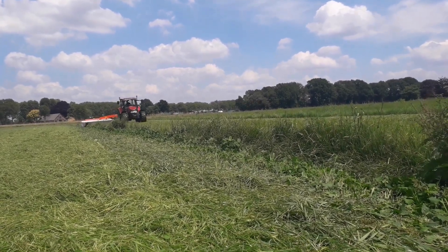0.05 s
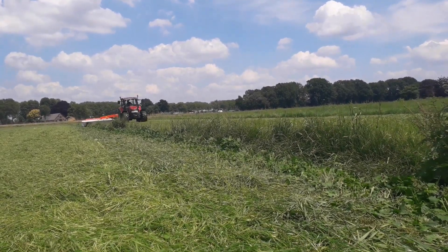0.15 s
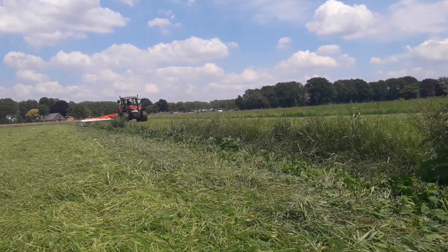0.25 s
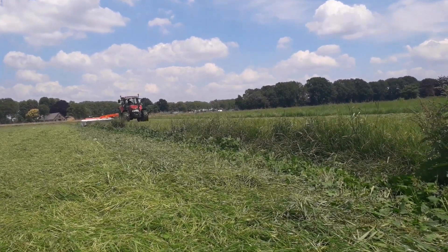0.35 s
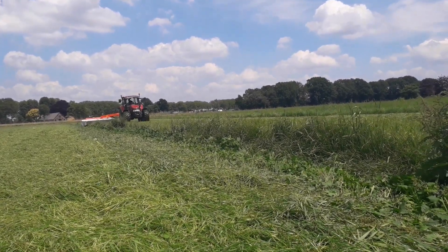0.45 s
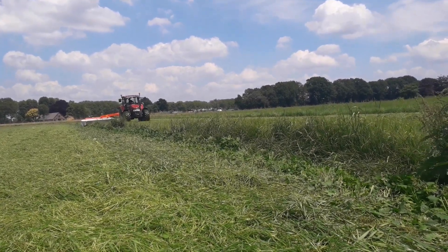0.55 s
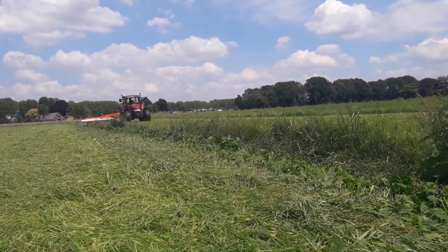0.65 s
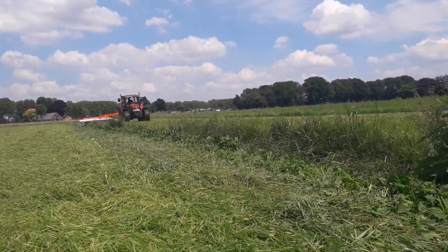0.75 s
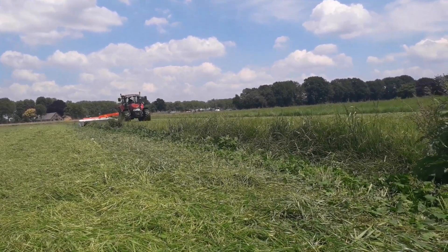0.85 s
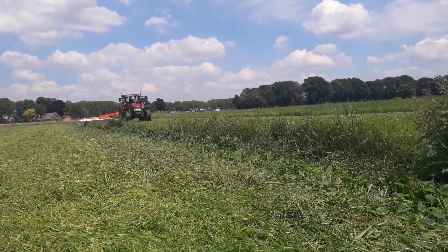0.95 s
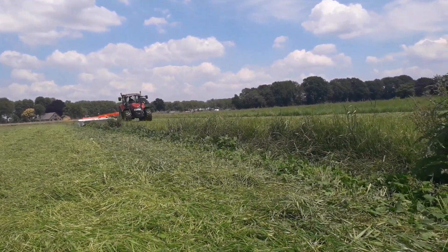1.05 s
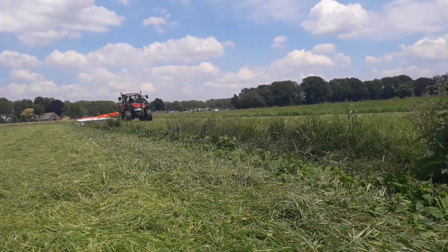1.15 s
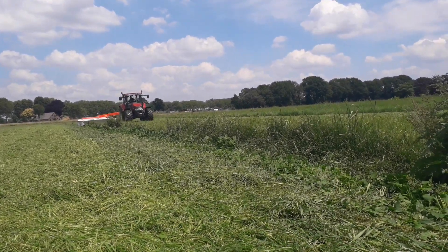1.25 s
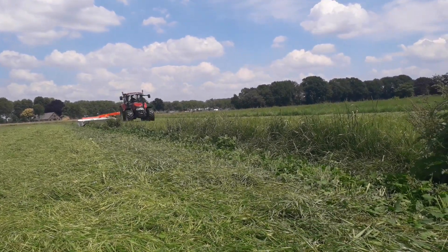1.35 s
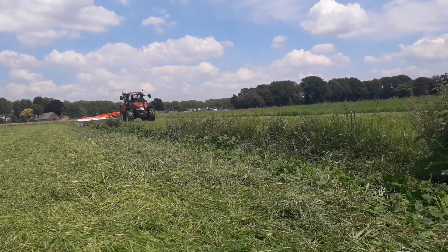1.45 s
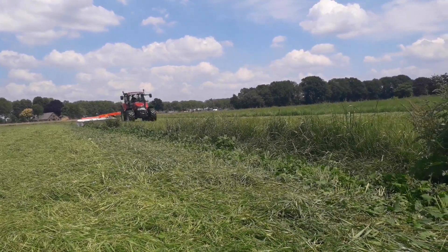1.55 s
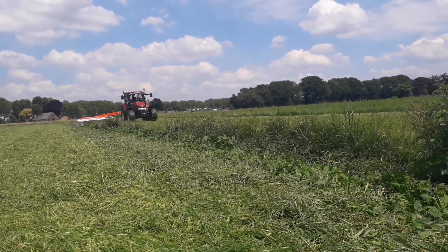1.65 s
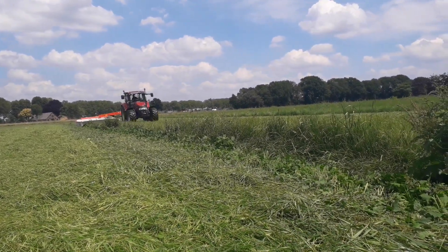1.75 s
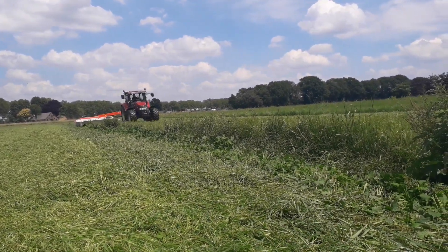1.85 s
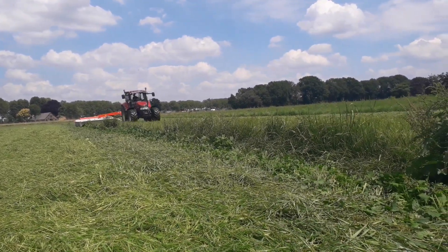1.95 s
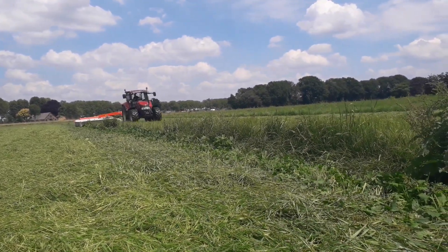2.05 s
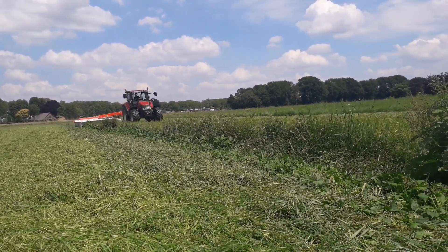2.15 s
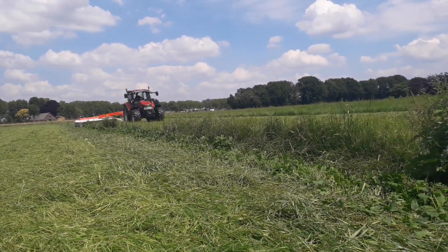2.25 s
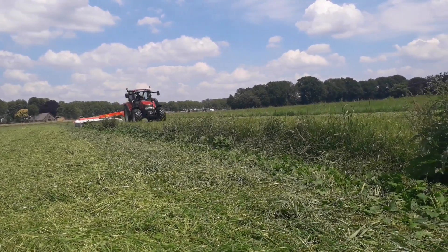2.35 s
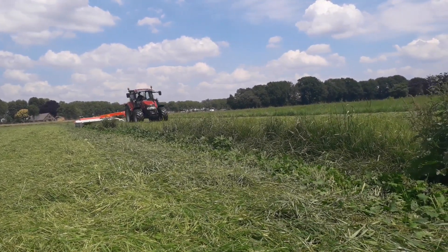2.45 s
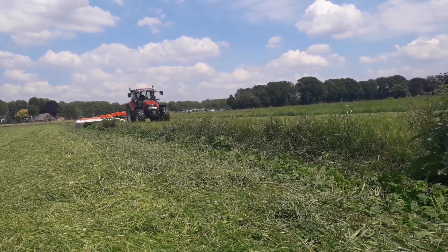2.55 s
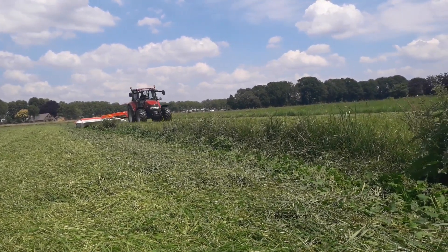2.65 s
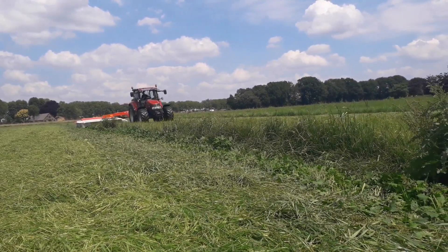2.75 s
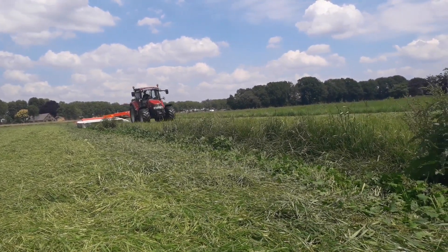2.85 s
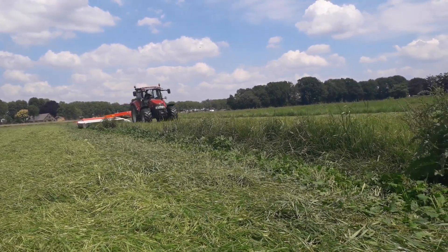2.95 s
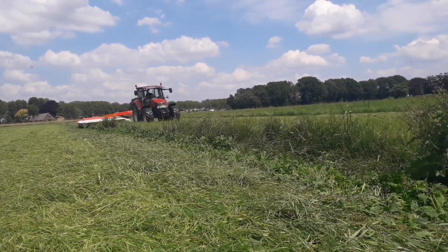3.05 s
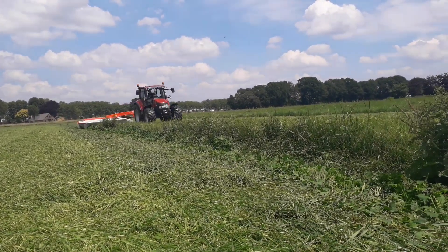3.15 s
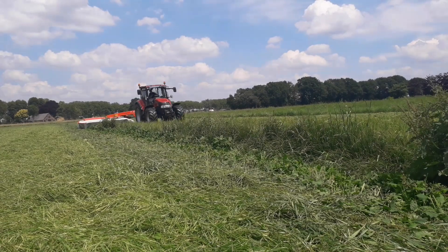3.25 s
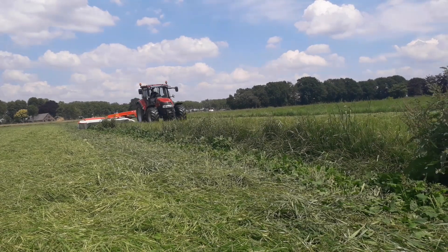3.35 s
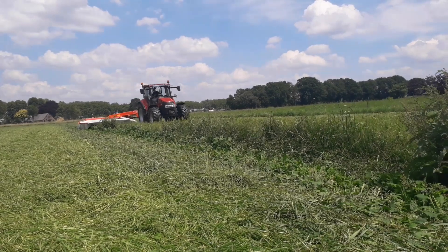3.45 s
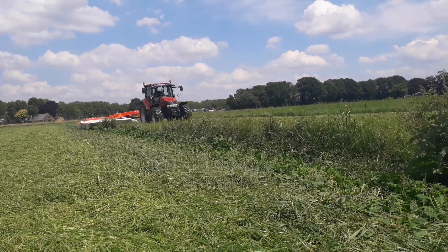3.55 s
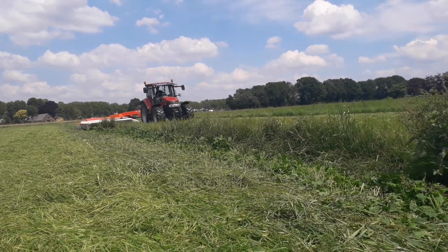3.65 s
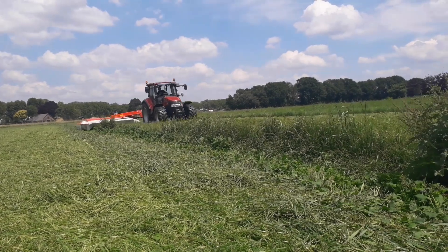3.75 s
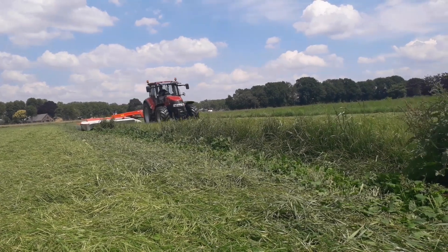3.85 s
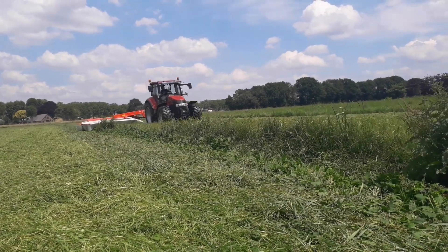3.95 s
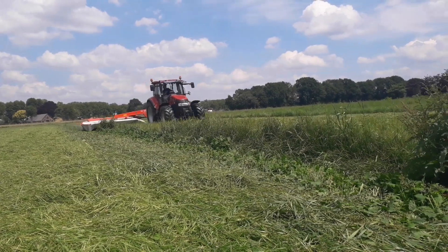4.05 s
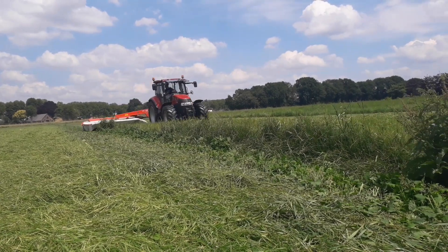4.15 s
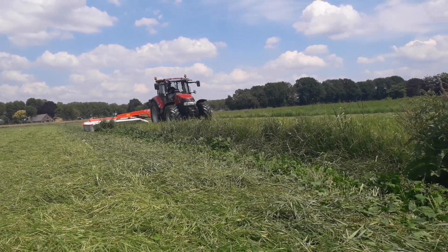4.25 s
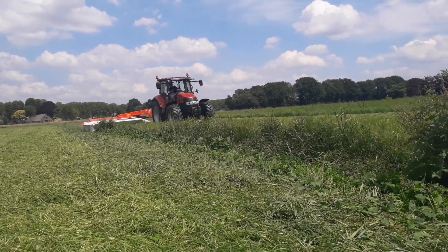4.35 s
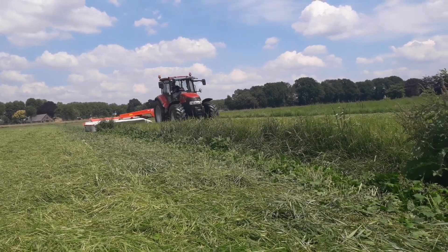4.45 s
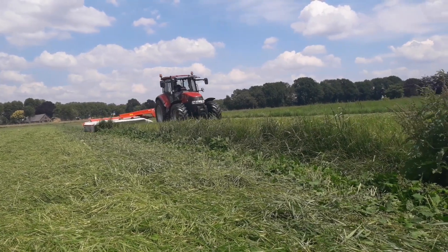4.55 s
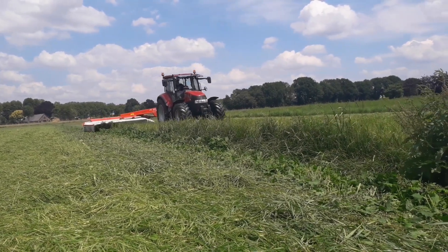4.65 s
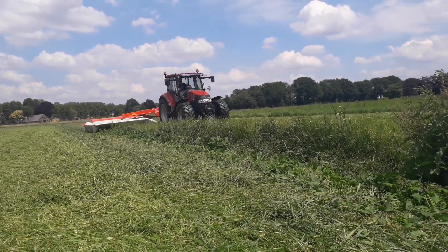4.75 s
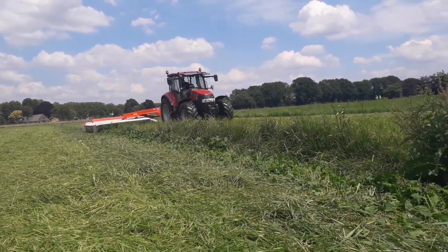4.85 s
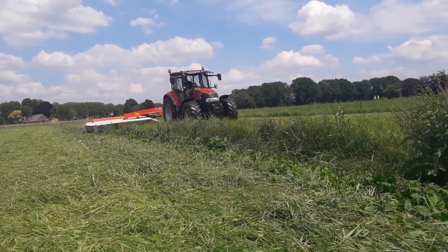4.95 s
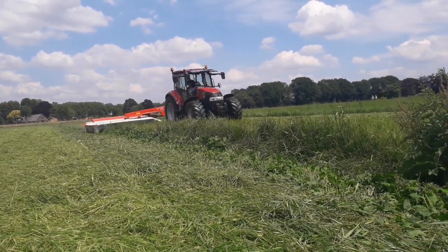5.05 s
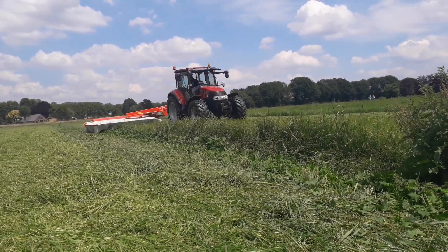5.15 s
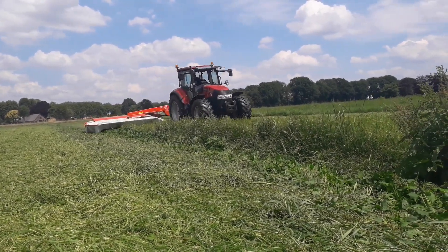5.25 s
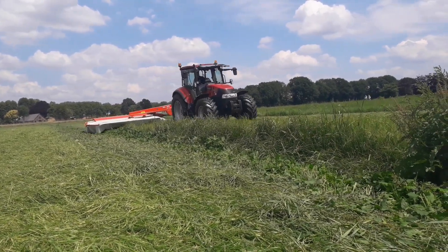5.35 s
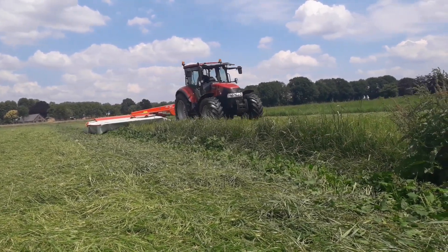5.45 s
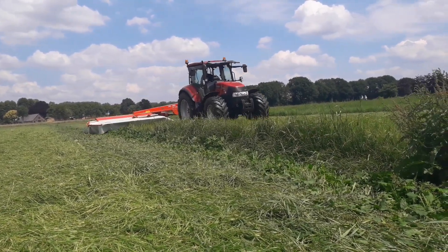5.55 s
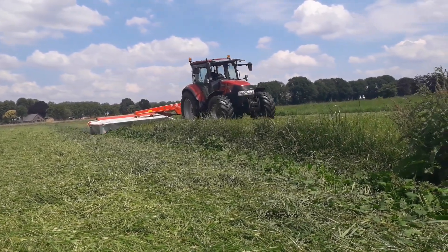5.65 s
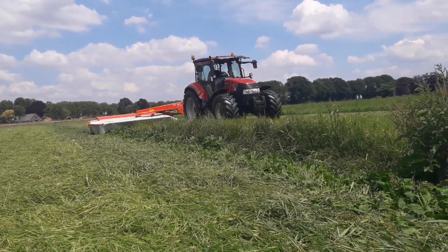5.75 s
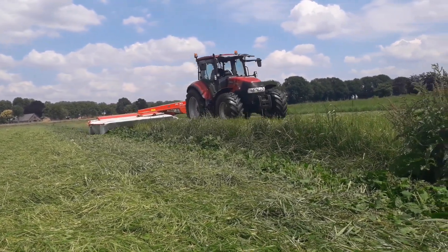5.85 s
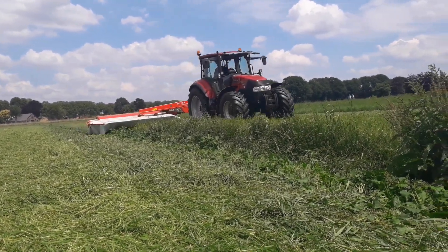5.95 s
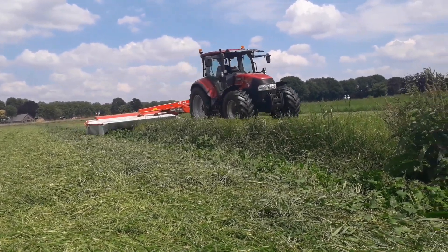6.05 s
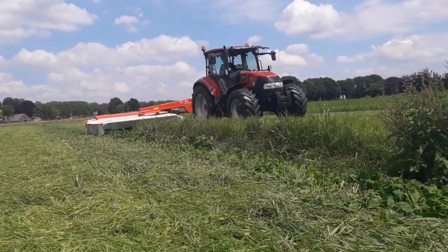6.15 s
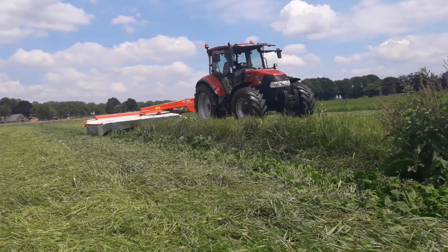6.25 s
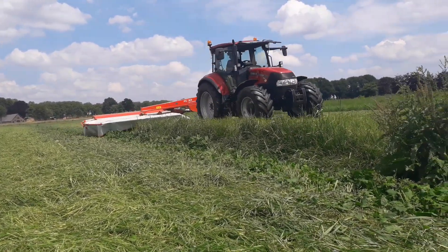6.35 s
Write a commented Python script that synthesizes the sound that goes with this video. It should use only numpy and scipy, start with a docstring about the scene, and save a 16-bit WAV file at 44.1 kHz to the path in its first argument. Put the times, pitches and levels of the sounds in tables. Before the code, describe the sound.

An open field with one stationary microphone, centred and dry. From 0 s a tractor and disc mower work some forty metres away: a steady hum around 205 Hz with a weaker tone an octave below, grainy diesel clatter, thin gear whine and a rushing, slightly uneven swish and hiss of cut grass. Tiny stalk cracks tick mainly before 1.7 s. The pitch sags slightly around 1.3 s and recovers. Wind rumble freshens, with soft thumps near 1.5 and 2.3 s, then hard ragged buffets around 2.4-3 s and 3.8-4 s, another at 4.3 s and scattered bumps to 5.8 s. From about 3.2 s the muffled exhaust note and boom open up. A sharper crack snaps at 4.8 s. By 5-6.4 s hum, clatter and bright grass hiss are close and strongest, with a very faint, extremely high turbo whistle, still approaching at the cut.

```python
"""Mowing an open hayfield

A tractor with a side-mounted disc mower comes closer, and a breeze rumbles and thumps on one microphone.
Sinusoids locked to the blade rate make the disc hum, gear whine and exhaust note; a free one, the turbo.
Filtered noise makes diesel clatter, the swish and hiss of cut stems, and wind; short bursts make cracks.
"""
import sys
import numpy as np
from scipy import signal
from scipy.fft import rfft, irfft
from scipy.io import wavfile
from scipy.ndimage import map_coordinates

SR = 44100
rng = np.random.default_rng(int(sys.argv[2]) if len(sys.argv) > 2 else 0)


def materialize(psi):
    """Save the field psi as 16-bit PCM at rate SR to the path in sys.argv[1].

    A 1-D psi becomes a single channel; in a 2-D psi each row is a channel.
    """
    bounded = np.clip(np.atleast_2d(psi).T, -1, 1)
    quanta = np.round(bounded * 32767).astype(np.int16)
    wavfile.write(sys.argv[1], SR, quanta)


N = 282240  # samples

# blade passes, sagging in thick grass: time_s, passes_per_s
BLADE_RATE = [(0, 103.5), (.3, 103.4), (.75, 102.7), (1.3, 102.0), (1.7, 102.1), (2.45, 102.7),
              (3.1, 103.3), (3.5, 103.0), (3.9, 103.1), (5.0, 102.4), (5.4, 102.9), (5.75, 102.7),
              (6.1, 103.1), (6.4, 103.2)]
# hum of the discs: time_s, level_db
HUM_LEVEL = [(0, -39.5), (.6, -37), (2.1, -34.5), (2.3, -30.5), (3.7, -27), (3.95, -25), (4.4, -26),
             (5.1, -21.5), (5.35, -22.5), (6.0, -19.8), (6.4, -19.6)]
# hum partials: multiple_of_blade_rate, relative_level_db
HUM_ORDERS = [(1, -7.5), (2, 0), (3, -22.5)]
# exhaust note, geared to the blades: multiple_of_blade_rate, relative_level_db
EXHAUST_ORDERS = [(6, 0), (6.55, -6), (7, -9), (8, -2.5), (8.5, -14), (9, -29)]
# gear whine: multiple_of_blade_rate, near_level_db, loss_db_per_m_farther_off
GEAR_ORDERS = [(9.43, -49.5, .65), (14.32, -37.5, 2), (15.1, -44.5, 0.5), (16.05, -45, 0.4),
               (19.25, -50, 0.7), (23.96, -45, 0.3), (25.4, -50, 4), (32.2, -48.5, 0.4)]
# turbocharger whistle: time_s, pitch_hz, level_db
TURBO_WHISTLE = [(0, 14900, -85), (2.6, 15080, -68), (3.8, 15110, -60), (3.95, 15120, -50),
                 (4.3, 15130, -60), (5.2, 15350, -68), (5.9, 15600, -53), (6.4, 15580, -51)]

# spectrum of the diesel clatter: frequency_hz, relative_level_db
CLATTER_COLOUR = [(200, -9), (400, -6), (550, -11.5), (720, -8), (920, -0.5), (1100, -5), (1300, -1.5),
                  (1580, -0.5), (1800, -2), (2000, 0), (2350, -3.5), (2900, -1.5), (4000, -3), (9000, -41)]
# spectrum of the engine block's drone: frequency_hz, relative_level_db
BLOCK_COLOUR = [(250, 9), (400, -3.5), (550, -1), (700, -1), (1000, -7), (2000, -32)]
# spectrum of the swath at the cutter bar: frequency_hz, relative_level_db
SWISH_COLOUR = [(1200, -21), (2400, -9), (3000, -4), (3400, 0.5), (3800, -3), (4300, -.5), (5300, -2),
                (6500, -7.5), (9000, -8), (16000, -38)]
# spectrum of the finer cutting hiss: frequency_hz, relative_level_db
HISS_COLOUR = [(3500, -13), (6000, -2), (7300, -4.5), (8400, -4), (9800, 3), (10800, -1.5), (12600, -3),
               (13600, -5.5), (16000, -9)]
# spectrum of the breeze's rumble: frequency_hz, relative_level_db
BREEZE_COLOUR = [(40, -26), (70, -3.5), (110, 0), (175, 3.5), (240, -6.5), (320, -16), (450, -46.5),
                 (700, -31), (1500, -69)]
# spectrum of the deep, slow eddies: frequency_hz, relative_level_db
SWELL_COLOUR = [(20, -28), (35, -16), (55, -7.5), (78, 2.5), (98, 5.5), (130, -18), (250, -69)]
# spectrum of the fine turbulence in hard gusts: frequency_hz, relative_level_db
GUST_COLOUR = [(150, -30), (280, 1), (420, -5), (550, -19), (750, -19), (1500, -50)]

# tufts and thin patches at the cutter bar: start_s, length_s, swish_lift_db, hiss_lift_db
TUFTS = [(.01, 0.028, 2.5, 7), (.27, 0.14, 4, 4.5), (.52, 0.12, 2.5, 3), (.7, 0.092, 4.5, 3.5),
         (1.0, 0.063, 4.5, 6), (1.16, 0.027, 4, 3), (2.15, 0.026, 1.5, 1.5), (2.64, 0.016, 5.5, 4.5),
         (2.79, 0.056, 1, 5), (3.19, 0.023, -0.5, 6.5), (3.52, .12, 0.5, 4), (3.9, 0.16, -1, -2),
         (4.18, 0.02, 1.5, 0.5), (4.8, 0.09, 5, 1.5), (5.37, 0.018, 0, 5.5)]
# the toughest stalks crack singly: start_s, relative_peak_db, centre_hz
CRACKS = [(.045, -15.5, 9700), (.554, -16, 5400), (.58, -13, 6800), (.724, -14, 10500), (.801, -17, 8000),
          (1.02, -12, 11000), (1.145, -16, 4900), (1.195, -16, 9000), (1.233, -16, 7500),
          (1.573, -13.5, 5500), (1.656, -16, 8500), (2.786, -15, 9000), (3.972, -17, 7600),
          (4.834, -4, 4570)]
# gusts: start_s, length_s, rumble_lift_db, deep_eddy_lift_db
GUSTS = [(.19, .04, 0, 11), (1.51, 0.075, 4.5, 15.5), (2.08, 0.13, -0.5, 13), (2.38, 0.16, 6.5, 18),
         (2.82, 0.14, 8.5, 15), (3.12, 0.25, 1.5, 11), (3.48, 0.21, 5, 11), (3.83, 0.12, 10, 21),
         (4.27, 0.3, 7.5, 14), (4.99, 0.079, 7.5, 10), (5.74, 0.18, 2.5, 5)]
# the hardest eddies strike the microphone: centre_s, relative_peak_db, pitch_hz
BUFFETS = [(1.237, -21, 119), (1.528, -20.5, 130), (2.08, -26, 95), (2.249, -16, 89), (2.365, -19, 94),
           (2.384, -14.5, 130), (2.45, -12, 275), (2.492, -13, 117), (2.781, -17.5, 200), (2.792, -23, 215),
           (2.875, -6, 195), (2.911, -11.5, 195), (2.919, -8.5, 109), (2.991, -14.5, 141),
           (3.17, -16, 85.5), (3.529, -16, 129), (3.704, -16, 200), (3.816, -14, 191), (3.827, -12, 95),
           (3.86, -11.5, 190), (3.872, -9, 225), (3.887, -9, 168), (3.912, -14, 183), (3.92, -7, 91),
           (3.941, -10, 89), (3.964, -18.5, 240), (4.336, -6.5, 114), (4.433, -12, 100), (4.49, -16, 140),
           (4.551, -17, 178), (4.645, -12, 110), (4.95, -11, 130), (4.998, -19, 200), (5.046, -21, 150),
           (5.074, -10.5, 168), (5.503, -11, 133), (5.793, -10, 111)]

START_M, SPEED_M_PER_S, NEAR_M = 42, 4.5, 13
# reference levels at NEAR_M; each growth is a power of 1 / distance (over 1: the ground absorbs too)
MACHINE_DB, MACHINE_FADE_DB_PER_M = -27, 0.6373
SWISH_DB, SWISH_GROWTH = -27, 0.91
HISS_DB, HISS_GROWTH = -26.5, 1.53
NOTE_DB, BOOM_DB, EXHAUST_GROWTH = -40, -38, 1.02
# from afar tall grass muffles exhaust and cutter bar; they open up between these times
MUFFLED_UNTIL_S, CLEAR_FROM_S = 3.15, 5.2
NOTE_MUFFLE_DB, BOOM_MUFFLE_DB = 13, 13.5
SWISH_MUFFLE_DB, HISS_MUFFLE_DB = 3.5, 2.5
TUFT_ATTACK_S, TUFT_RELEASE_S = 0.05, 0.059
# the breeze freshens steadily: starting level and rise of its rumble and of its deep eddies
BREEZE_DB, BREEZE_DB_PER_S = -39.5, 1.7649
SWELL_DB, SWELL_DB_PER_S = -55, 1.45
GUST_ATTACK_S, GUST_RELEASE_S = 0.055, 0.071
CUTOFF_HZ = 15800


def from_db(db):
    """Amplitude ratio: twenty decibels make a factor of ten."""
    return 10 ** (np.asarray(db) / 20)


def rms_one(x):
    """Normalisation: scale a signal to unit mean power."""
    return x / np.sqrt(np.mean(x ** 2) + 1e-20)


def in_time(rows):
    """Linear interpolation: each column of a timed curve, sample by sample."""
    s, *columns = np.transpose(rows)
    return [np.interp(np.arange(N) / SR, s, column) for column in columns]


def drift(rate_hz):
    """Low-pass noise: slow chance of unit spread, changing about rate_hz times a second."""
    step = 40  # samples between the points of the slow curve
    pole = np.exp(-2 * np.pi * rate_hz * step / SR)
    chance = rng.standard_normal(N // step + 2002)
    slow = signal.lfilter([1], [1, -2 * pole, pole * pole], chance)[2000:]  # settled part only
    return np.interp(np.arange(N) / step, np.arange(len(slow)), rms_one(slow))


def coloured(x, colour):
    """Source and filter: an excitation takes on a spectrum, at unit power."""
    hz, db = np.transpose(colour)
    bins_hz = np.maximum(np.fft.rfftfreq(N, 1 / SR), 1)
    gain = from_db(np.interp(np.log(bins_hz), np.log(hz), db))
    return rms_one(irfft(rfft(x) * gain, N))


def surges(rows, attack_s, release_s):
    """Gaussian shoulders: each event swells, holds and dies away; one dB curve per lift column."""
    t = np.arange(N) / SR
    lift_db = 0
    for start_s, length_s, *lifts_db in rows:
        before = np.maximum(start_s - t, 0) / attack_s
        after = np.maximum(t - start_s - length_s, 0) / release_s
        lift_db = lift_db + np.outer(lifts_db, np.exp(-(before + after) ** 2))
    return lift_db


def distance():
    """Uniform motion: metres to the tractor, which drives up at constant speed."""
    return START_M - SPEED_M_PER_S * np.arange(N) / SR


def muffled():
    """Screening: 1 while tall grass hides the machine, 0 once it is in the clear."""
    return in_time([(MUFFLED_UNTIL_S, 1), (CLEAR_FROM_S, 0)])[0]


def partials(passes, orders, flutter, smear):
    """Order locking: lines follow the blades; moving air shakes level and phase, high ones' phase most."""
    out = 0
    for order, db in orders:
        phase = 2 * np.pi * (order * passes + rng.random()) + smear * order * drift(7.4)
        level = from_db(db) * (1 + flutter * drift(9.1))
        out = out + level * np.sqrt(2) * np.sin(phase)
    return out


def throb(passes, blade_db, turn_db, ragged_db):
    """Amplitude modulation: level swells with every blade and disc turn, never twice alike."""
    swell_db = blade_db * np.cos(2 * np.pi * passes) + turn_db * np.cos(np.pi * passes)
    return rms_one(from_db(swell_db + ragged_db * drift(30)))


def discs(passes):
    """Periodic pressure pulses: the blades beat the air into a deep, steady hum."""
    hum_db, = in_time(HUM_LEVEL)
    return from_db(hum_db) * partials(passes, HUM_ORDERS, flutter=.06, smear=.025)


def machine(passes, farther_m):
    """Broadband and tonal radiation: diesel clatter and gear whine grow as the tractor nears."""
    strokes = throb(passes, blade_db=0.1, turn_db=-0.65, ragged_db=0.78)
    clatter = from_db(2.0) * coloured(rng.standard_normal(N) * strokes, CLATTER_COLOUR)
    # soft ground swallows the low middle from afar, so the block's drone only tells close by
    block = coloured(rng.standard_normal(N), BLOCK_COLOUR) * from_db(-2.0 - 0.69 * farther_m)
    engine_gain = from_db(MACHINE_DB - MACHINE_FADE_DB_PER_M * farther_m)
    whine = 0
    for order, db, fade_db in GEAR_ORDERS:
        tone = partials(passes, [(order, 0)], flutter=0.53, smear=0.014)
        whine = whine + from_db(db - fade_db * farther_m) * tone
    return engine_gain * (clatter + block) + whine


def snaps(per_s, spread_db):
    """Random impulses: stems part at chance instants, most faintly, a few sharply."""
    sizes = from_db(spread_db * np.minimum(rng.exponential(1, N), 6))
    happens = rng.random(N) < per_s / SR
    return rms_one(happens * sizes * rng.choice([-1, 1], N))


def blade_buzz(passes, smear):
    """Comb spectrum: every disc turn repeats much the same scrape, so the swish has fine strands."""
    one_turn = rng.standard_normal(round(2 * SR / BLADE_RATE[0][1]))  # two blades a turn
    turns = (passes + smear * drift(4.6)) / 2
    return map_coordinates(one_turn, [turns % 1 * len(one_turn)], order=3, mode="grid-wrap")


def grass(passes, near_db, uneven_db):
    """Friction and fracture noise: the swath swishes, stems snap; levels shift with tufts and thin patches."""
    swish_lift_db, hiss_lift_db = surges(TUFTS, TUFT_ATTACK_S, TUFT_RELEASE_S)
    swish_db = SWISH_DB + SWISH_GROWTH * near_db - SWISH_MUFFLE_DB * muffled() + swish_lift_db
    hiss_db = HISS_DB + HISS_GROWTH * near_db - HISS_MUFFLE_DB * muffled() + hiss_lift_db
    hiss_db = hiss_db + uneven_db * drift(4)
    strokes = throb(passes, blade_db=1.0, turn_db=0.46, ragged_db=0.68)
    stems = from_db(-8.5) * snaps(per_s=2000, spread_db=4.0)
    leaves = from_db(-7.0) * snaps(per_s=3500, spread_db=4.5)
    buzz = from_db(-6.0) * blade_buzz(passes, smear=0.014)
    swish = coloured(strokes * (rng.standard_normal(N) + buzz + stems), SWISH_COLOUR)
    hiss = coloured(strokes * (rng.standard_normal(N) + leaves), HISS_COLOUR)
    return from_db(swish_db) * swish + from_db(hiss_db) * hiss


def through_air(x, edge_hz, far_loss):
    """Atmospheric absorption: air takes off the highest treble, less and less as the distance closes."""
    top = signal.sosfiltfilt(signal.butter(2, edge_hz, "high", fs=SR, output="sos"), x)
    return x - np.linspace(far_loss, 0, N) * top


def stalks(fade_s, level_db):
    """Impulsive fracture: a tough stalk breaks with a crack about a millisecond long."""
    out = np.zeros(N)
    age_s = np.arange(SR // 100) / SR
    for start_s, db, hz in CRACKS:
        octave = [hz / np.sqrt(2), hz * np.sqrt(2)]
        band = signal.butter(2, octave, "band", fs=SR, output="sos")
        crack = signal.sosfilt(band, rng.standard_normal(len(age_s)) * np.exp(-age_s / fade_s))
        start = round(start_s * SR)
        out[start:start + len(age_s)] += from_db(db + level_db) * crack / np.abs(crack).max()
    return out


def push_pull(age):
    """Pressure doublet: a passing eddy against its age in radians; height 1."""
    return -age * np.exp((1 - np.minimum(age ** 2, 100)) / 2)


def wind(lumpy_db, swell_lumpy_db, pop_db):
    """Turbulent pressure: eddies rumble at the port and rise in gusts; each strong one thumps."""
    t = np.arange(N) / SR
    gust_db, deep_gust_db = surges(GUSTS, GUST_ATTACK_S, GUST_RELEASE_S)
    breeze_db = BREEZE_DB + BREEZE_DB_PER_S * t + gust_db
    swell_db = SWELL_DB + SWELL_DB_PER_S * t + deep_gust_db + swell_lumpy_db * drift(2.4)
    lumps = from_db(lumpy_db * drift(16))
    rumble = from_db(breeze_db) * coloured(rng.standard_normal(N) * lumps, BREEZE_COLOUR)
    swell = from_db(swell_db) * coloured(rng.standard_normal(N), SWELL_COLOUR)
    # fine turbulence grows with the square of the rumble, so only hard gusts sound ragged
    ragged = from_db(2 * breeze_db + 4) * coloured(rng.standard_normal(N) * lumps, GUST_COLOUR)
    pops = sum(from_db(db) * push_pull(2 * np.pi * hz * (t - s)) for s, db, hz in BUFFETS)
    pops = signal.sosfilt(signal.butter(2, 55, "high", fs=SR, output="sos"), pops)
    return rumble + swell + ragged + from_db(pop_db) * pops


def turbo():
    """Frequency and amplitude modulation: a thin, airy whistle wavers and mostly climbs."""
    hz, db = in_time(TURBO_WHISTLE)
    wavering_hz = hz + 20 * drift(90)
    tone = np.sqrt(2) * np.sin(2 * np.pi * np.cumsum(wavering_hz) / SR)
    return from_db(db) * drift(30) * tone


def exhaust(passes, near_db):
    """Pulsed flow: the exhaust note and its pipe's boom come through as the tractor draws near."""
    note = partials(passes, EXHAUST_ORDERS, flutter=0.21, smear=0.017)
    boom = partials(passes, [(4, 0)], flutter=0.43, smear=0.064)
    note = from_db(NOTE_DB - NOTE_MUFFLE_DB * muffled()) * note
    boom = from_db(BOOM_DB - BOOM_MUFFLE_DB * muffled()) * boom
    return from_db(EXHAUST_GROWTH * near_db) * (note + boom)


def scene():
    """Superposition: all sources add at one microphone, alike in both channels."""
    passes = np.cumsum(in_time(BLADE_RATE)[0]) / SR
    distance_m = distance()
    near_db = 20 * np.log10(NEAR_M / distance_m)
    tractor = discs(passes) + machine(passes, distance_m - NEAR_M) + turbo() + exhaust(passes, near_db)
    cutting = through_air(grass(passes, near_db, uneven_db=1.26), edge_hz=12700, far_loss=0.67)
    cracks = stalks(fade_s=0.00077, level_db=-5.5)
    breeze = wind(lumpy_db=2.5, swell_lumpy_db=2.0, pop_db=-1.0)
    return np.tile(tractor + cutting + cracks + breeze, (2, 1))


def record(dry):
    """Band limiting: the microphone sheds the deepest bass and the top is cut."""
    thinned = signal.sosfilt(signal.butter(2, 28, "high", fs=SR, output="sos"), dry)
    return signal.sosfilt(signal.ellip(12, .1, 90, CUTOFF_HZ, fs=SR, output="sos"), thinned)


dry = scene()
out = record(dry)
materialize(out)
```